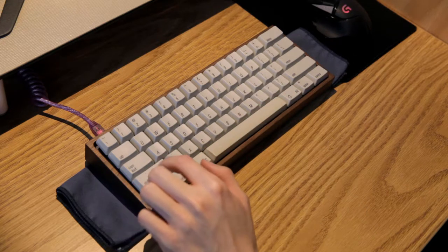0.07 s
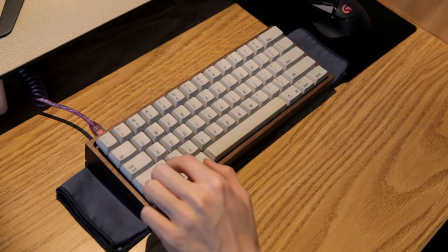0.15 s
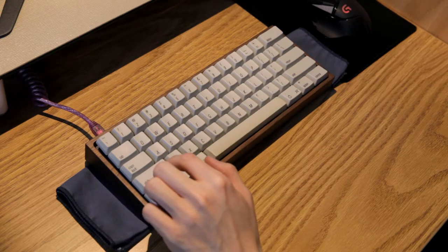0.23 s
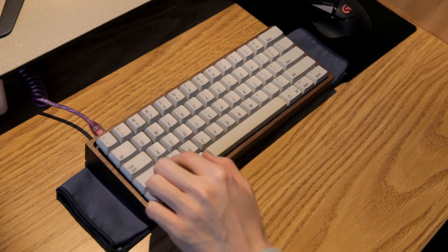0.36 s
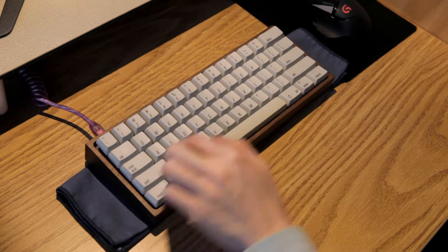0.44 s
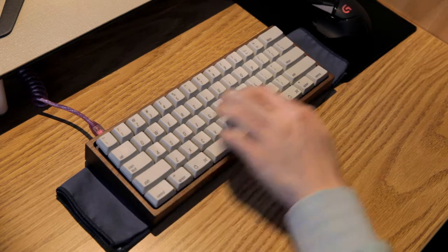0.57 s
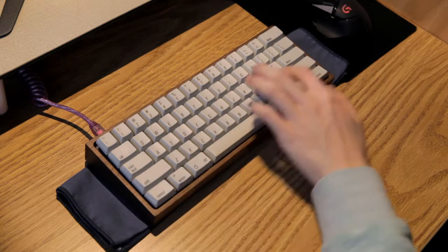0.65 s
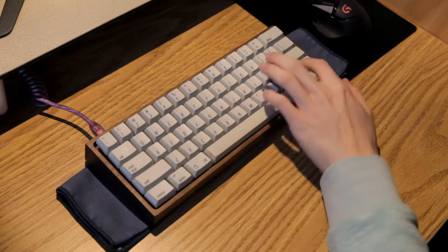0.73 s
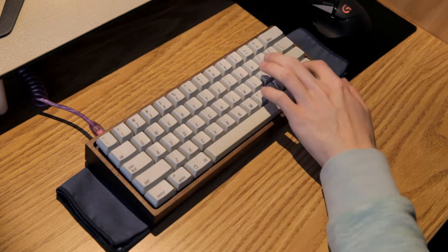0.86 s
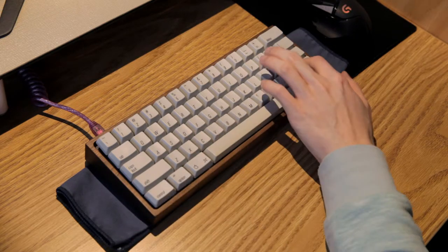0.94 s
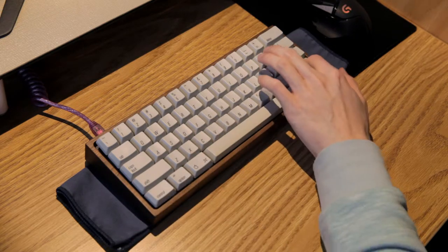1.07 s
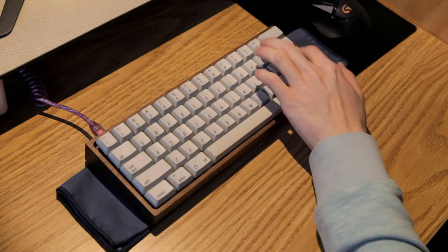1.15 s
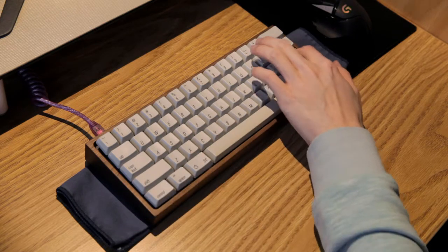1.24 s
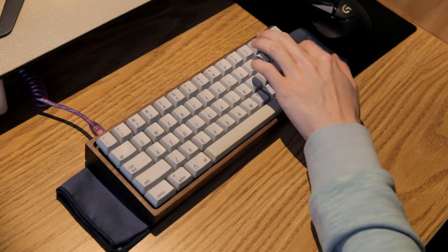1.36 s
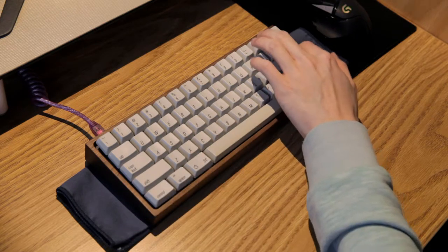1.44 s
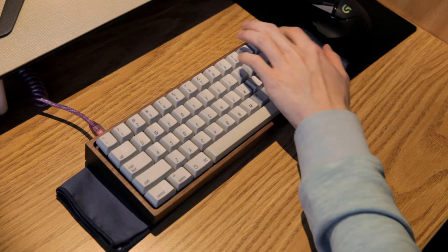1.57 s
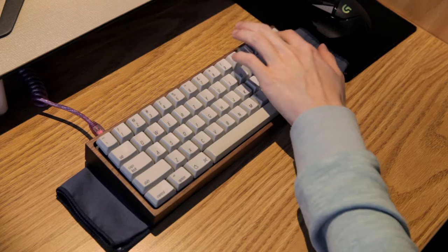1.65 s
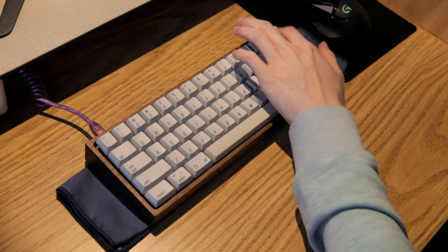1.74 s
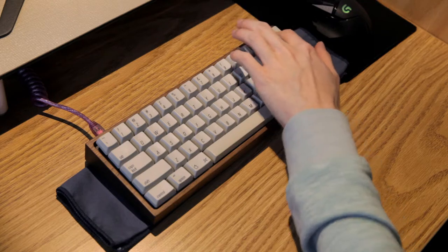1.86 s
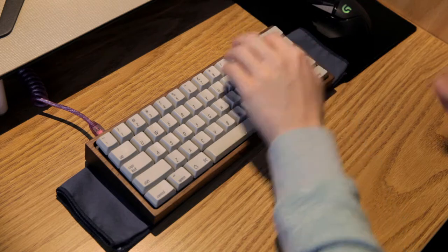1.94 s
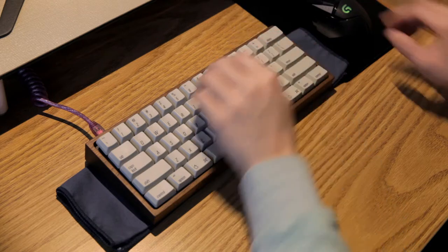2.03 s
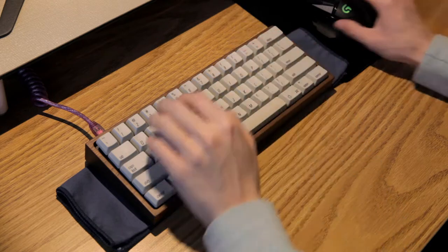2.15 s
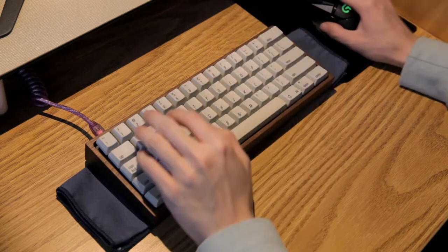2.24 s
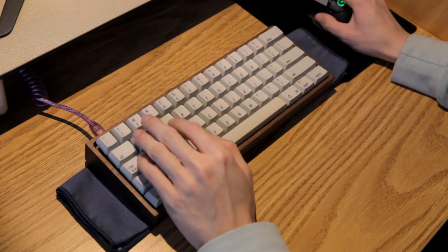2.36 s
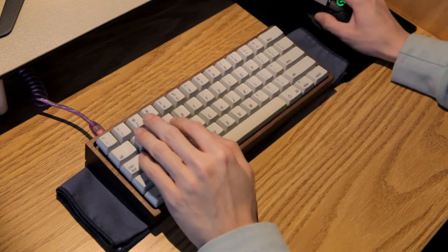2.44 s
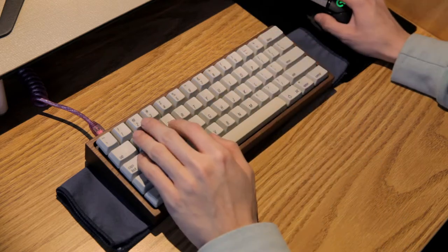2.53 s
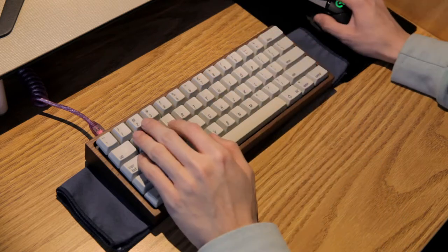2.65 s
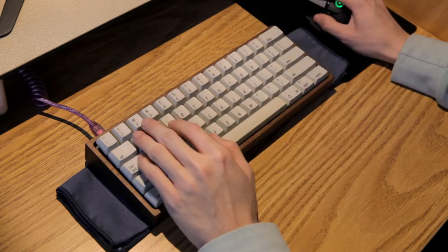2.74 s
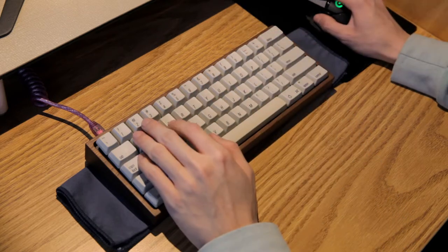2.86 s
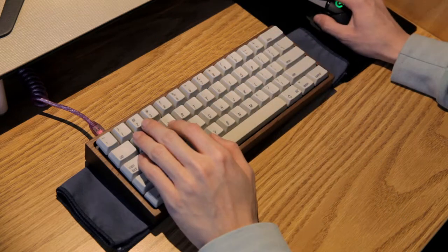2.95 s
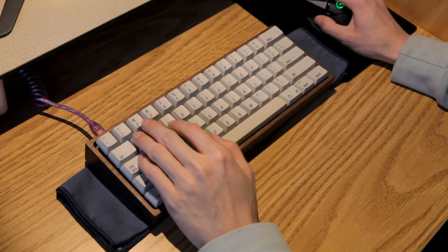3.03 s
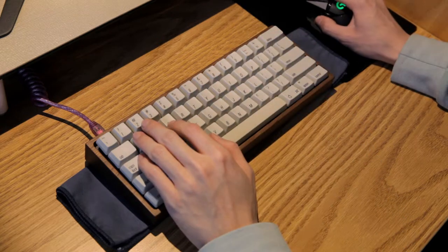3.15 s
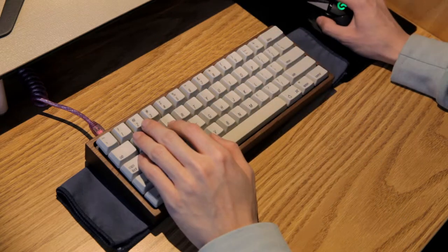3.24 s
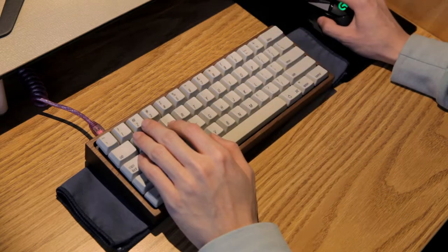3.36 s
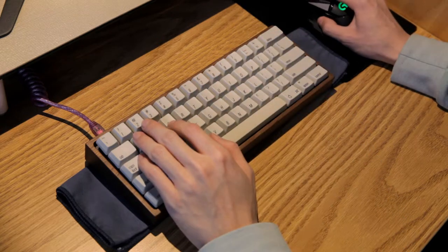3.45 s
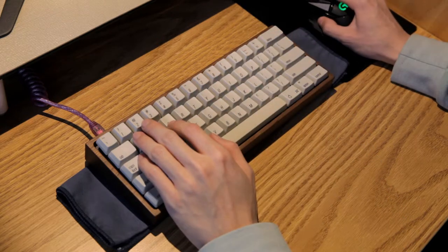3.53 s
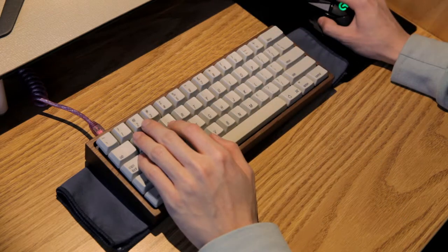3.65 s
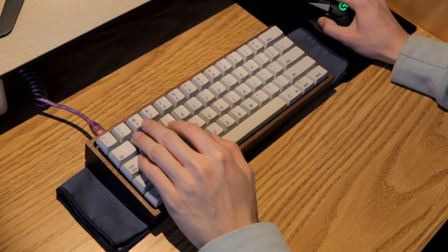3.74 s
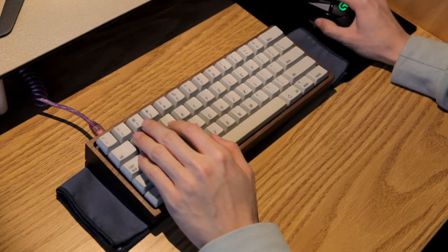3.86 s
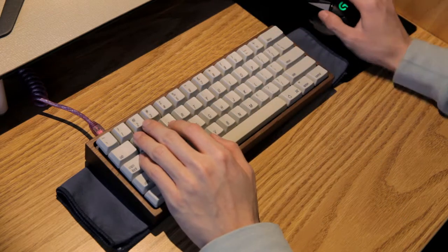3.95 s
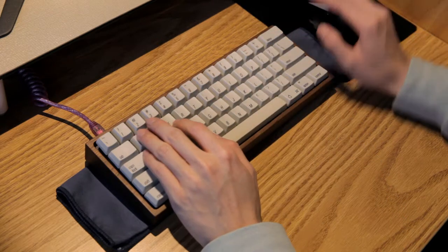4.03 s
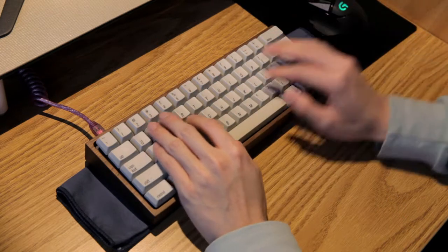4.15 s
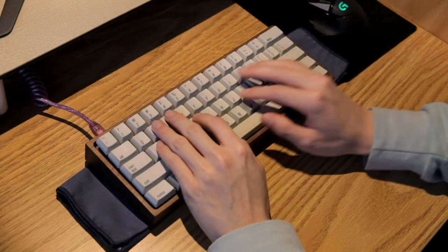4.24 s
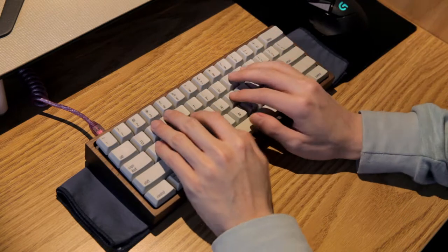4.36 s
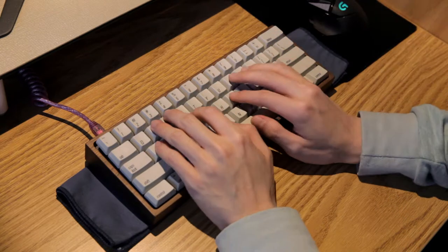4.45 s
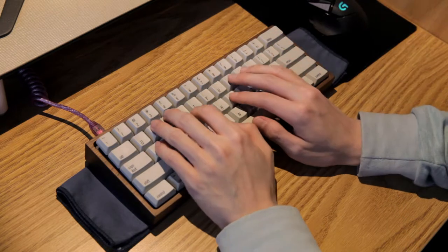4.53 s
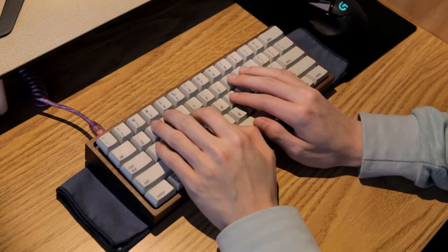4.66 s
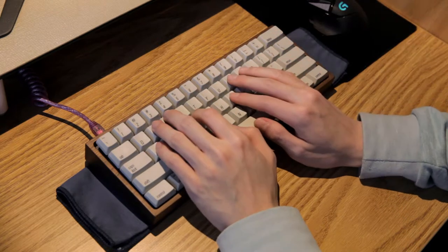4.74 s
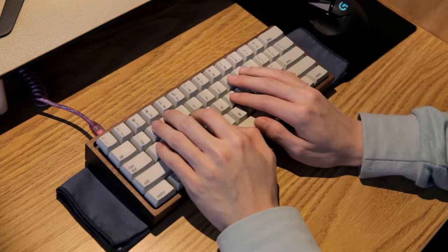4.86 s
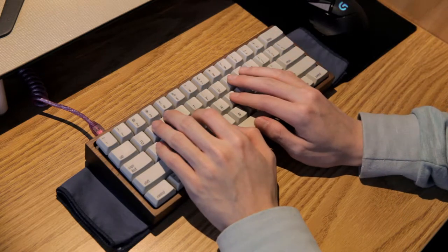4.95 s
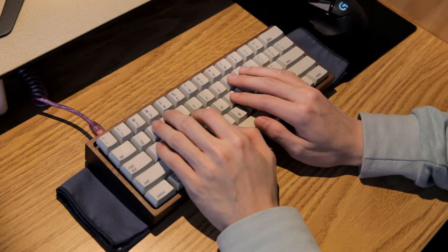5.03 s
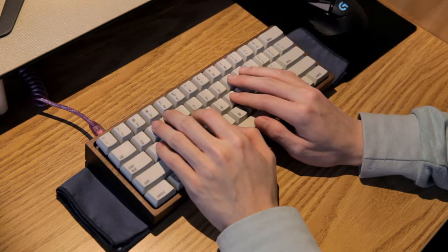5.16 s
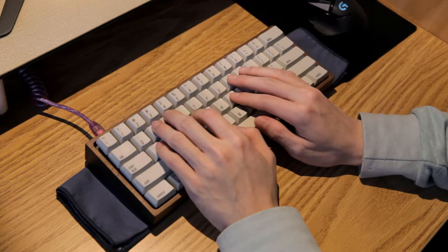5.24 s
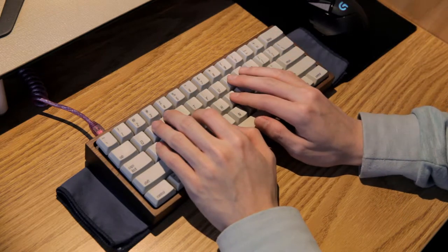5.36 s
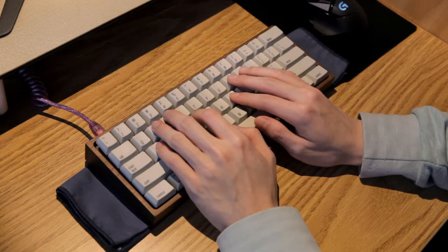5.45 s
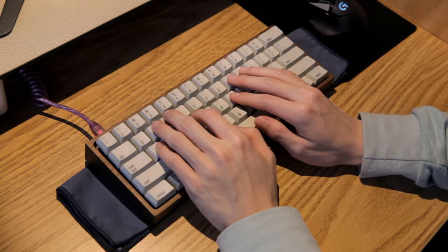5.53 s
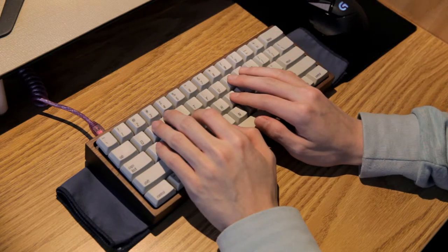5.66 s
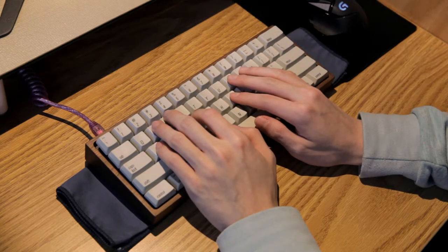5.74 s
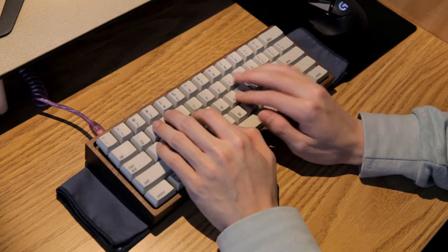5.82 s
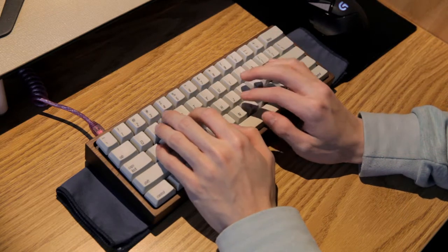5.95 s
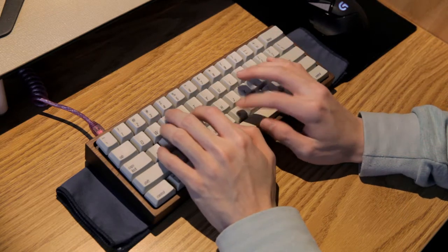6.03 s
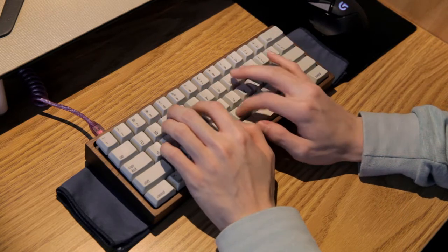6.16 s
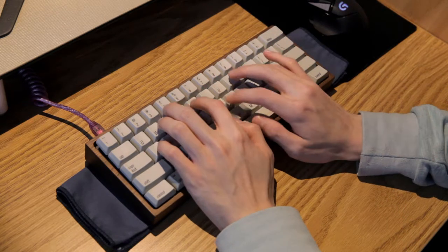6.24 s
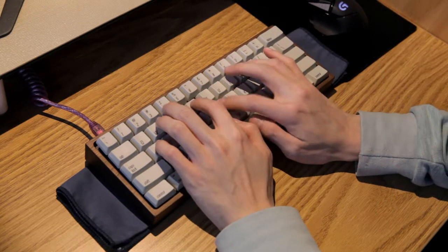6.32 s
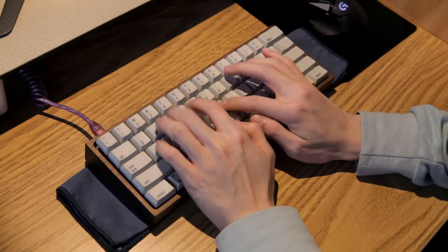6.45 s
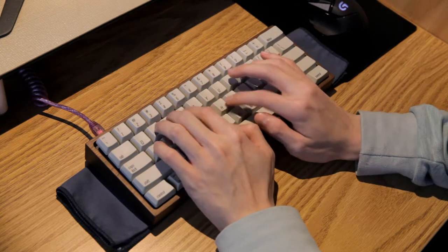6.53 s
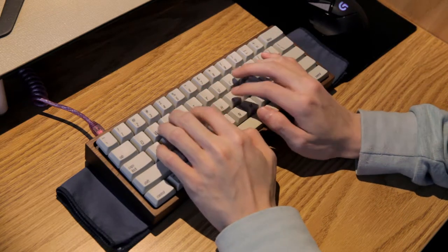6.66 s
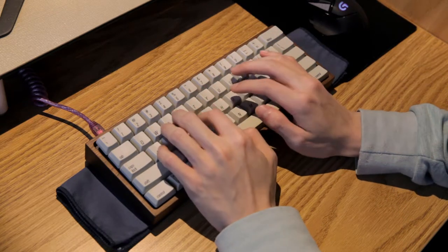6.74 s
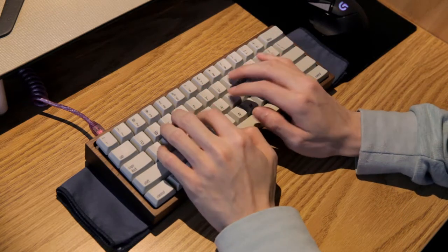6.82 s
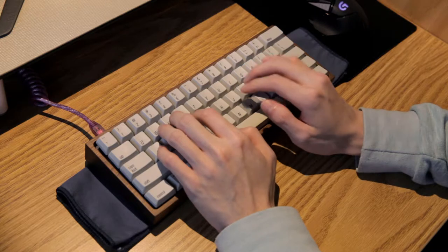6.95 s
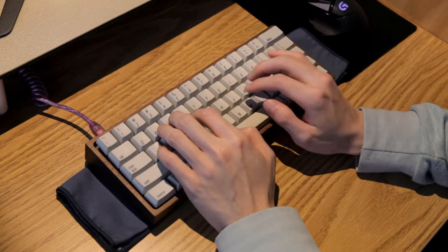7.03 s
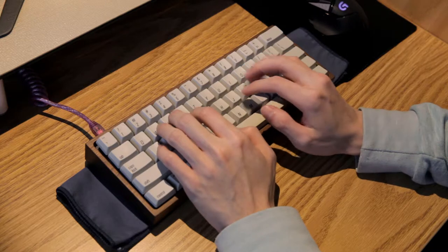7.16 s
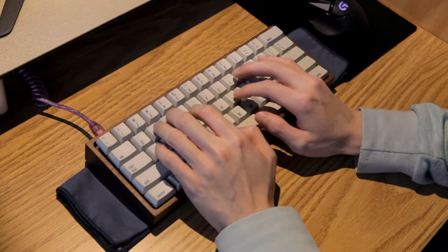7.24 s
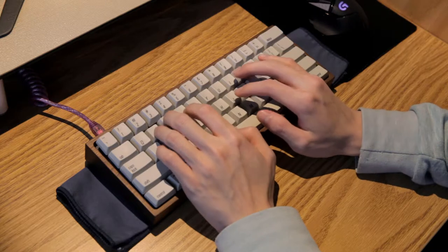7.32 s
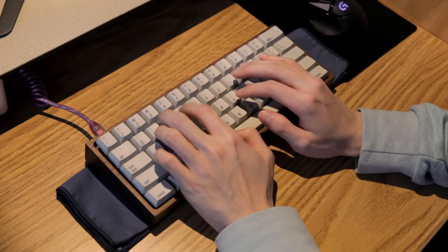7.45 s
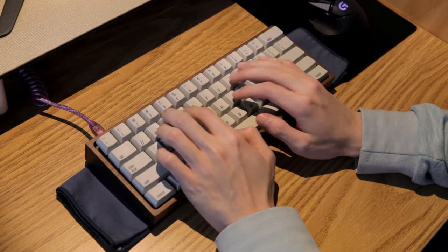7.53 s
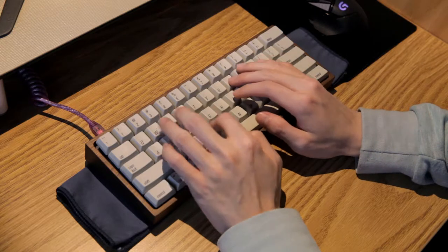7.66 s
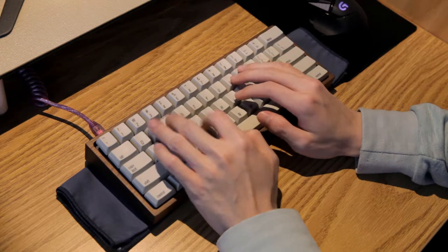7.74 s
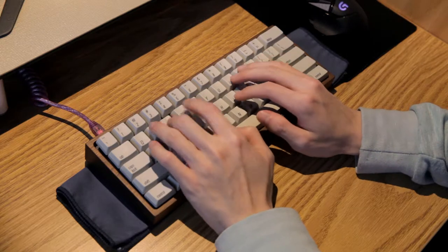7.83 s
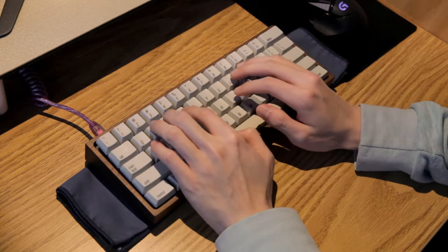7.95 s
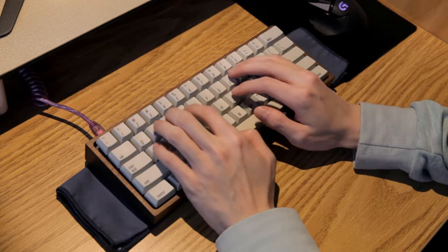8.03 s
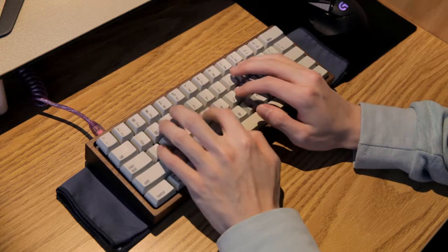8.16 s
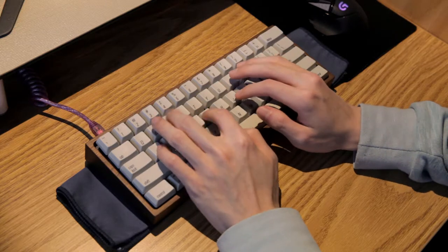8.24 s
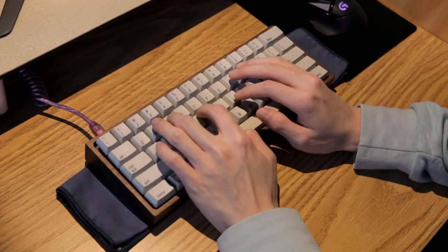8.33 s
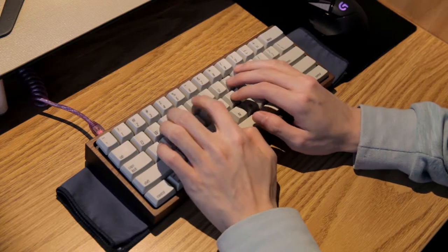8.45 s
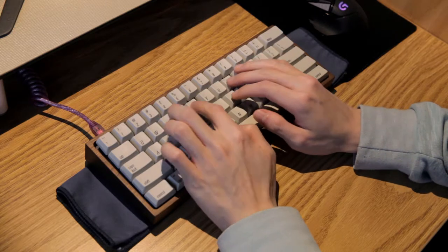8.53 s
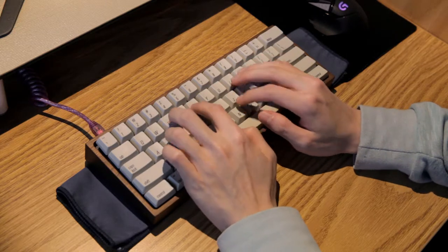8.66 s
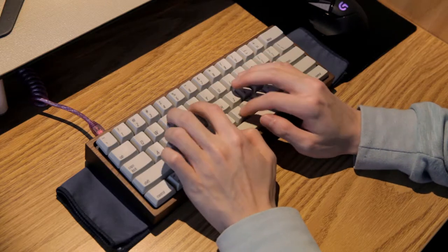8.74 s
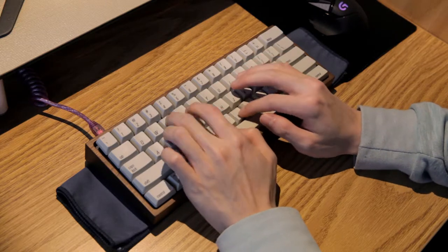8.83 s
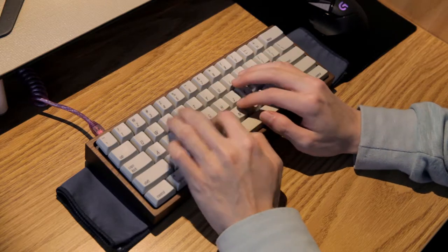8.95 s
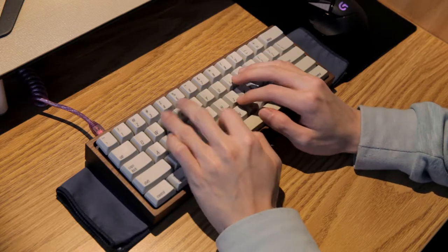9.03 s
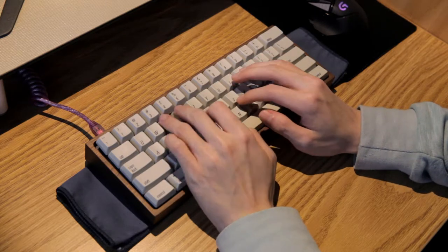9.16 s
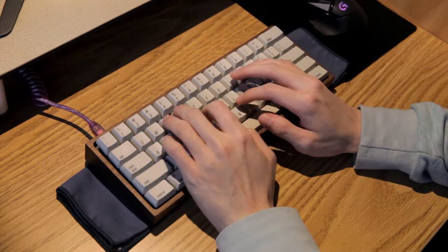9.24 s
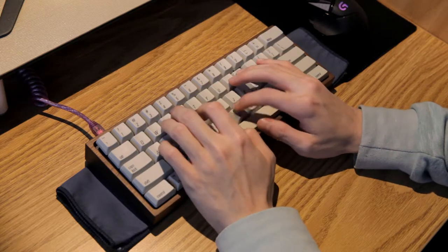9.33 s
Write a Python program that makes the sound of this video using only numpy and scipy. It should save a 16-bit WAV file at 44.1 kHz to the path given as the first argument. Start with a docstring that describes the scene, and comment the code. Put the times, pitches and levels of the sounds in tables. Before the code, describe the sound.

Crisp clicky mechanical keyboard on a wooden desk: slow single test presses, two mouse clicks, a pause, then fast continuous typing, close up.

```python
"""A clicky mechanical keyboard in a wooden case on a desk, close to a spaced microphone pair in a small room.
A deep hum swells and fades throughout. A corner key is rocked, then a wide key tried; the desk drones.
Fingers brush, a sleeve slides, a mouse button clicks twice, the sleeve slides again and a hand settles.
Fast typing follows: switches snap, keycaps land and knock case and desk, loose caps rattle.
Hits are shaped noise bursts and ringing modes; air and cloth are shaped noise, the hum a sine."""
import sys
import numpy as np
from scipy import signal
from scipy.fft import rfft, irfft, next_fast_len
from scipy.io import wavfile
from scipy.ndimage import map_coordinates

SR = 44100
rng = np.random.default_rng(int(sys.argv[2]) if len(sys.argv) > 2 else 0)


def pcm_store(signal):
    """Save signal as 16-bit PCM."""
    levels = np.round(np.clip(np.atleast_2d(signal), -1, 1) * 32767)
    wavfile.write(sys.argv[1], SR, levels.astype(np.int16).T)


N = 414099

# one hit: length in samples, time axis, frequency axis
LENGTH = 16384
AGE_S = np.arange(LENGTH) / SR
HZ = np.fft.rfftfreq(LENGTH, 1 / SR)
IMPACT_T60_S = 0.009

# wide key at the far end going down: (time [s], clack level [dB], thump level [dB])
WIDE_DOWN_STROKES = [(0.9501, -36.5, -45), (1.1289, -33.5, -35.5), (1.337, -37.5, -34.5), (1.492, -32, -34),
                     (1.7007, -32.5, -29.5), (1.867, -34.5, -31.5)]
# wide key coming up: (time [s], clack level [dB], note pitch [Hz])
WIDE_UP_STROKES = [(0.851, -31.5, 1715), (1.04, -33.5, 1367), (1.244, -31.5, 883), (1.4111, -31, 852),
                   (1.634, -36, 710), (1.779, -33.5, 850)]
# letter keys hitting bottom: (time [s], clack level [dB])
LETTER_PRESSES = [(6.41, -32.5), (6.87, -29), (7.03, -31), (7.1711, -28.5), (7.683, -29.5), (7.7654, -26),
                  (8.1903, -31), (8.791, -28), (8.9346, -28), (9.1435, -26.5), (9.35, -33)]
# keys springing back to the top stop:
# (time [s], clack level [dB], keycap pitch [Hz], case knock level [dB])
KEY_RELEASES = [(5.9413, -26.5, 2080, -47), (6.0886, -26.5, 1520, -50), (6.1816, -26, 1640, -41.5),
                (6.3012, -28, 1460, -36.5), (6.357, -27.5, 2220, -42.5), (6.4941, -28.5, 2070, -42),
                (6.5511, -25.5, 1304, -50), (6.745, -28.5, 2220, -39.5), (6.804, -26.5, 1650, -46),
                (6.96, -25.5, 1600, -51), (7.1031, -27, 1450, -50.5), (7.245, -23.5, 1700, -56),
                (7.31, -22, 1940, -49.5), (7.4916, -26, 1900, -48), (7.576, -25.5, 1960, -36),
                (7.8804, -27.5, 1890, -40.5), (8.0527, -24.5, 2150, -46), (8.096, -29, 1590, -39.5),
                (8.2857, -29, 1520, -41.5), (8.4343, -25, 1670, -57), (8.5225, -25.5, 1520, -38),
                (8.6322, -28.5, 1930, -37.5), (8.78, -26.5, 1180, -39), (8.8466, -27.5, 1540, -41.5),
                (8.991, -31.5, 1380, -42), (9.089, -27.5, 1580, -39), (9.133, -27.5, 1570, -59),
                (9.305, -24, 1570, -47)]
# thumb on the space bar: (time [s], clack level [dB])
SPACE_STROKES = [(6.649, -25.5), (7.397, -27.5), (7.9721, -27), (8.3467, -25), (8.706, -27.5),
                 (8.9668, -30.5), (9.2081, -25.5)]
# switches snapping in the typing: (time [s], level [dB])
TYPING_SNAPS = [(5.936, -34.5), (6.078, -26.5), (6.161, -33), (6.175, -30), (6.2029, -34), (6.295, -29.0),
                (6.314, -32), (6.35, -29), (6.4077, -37.5), (6.479, -30.5), (6.4865, -30.5), (6.5443, -33),
                (6.638, -35.5), (6.721, -39), (6.739, -29), (6.796, -30.5), (6.8453, -32), (6.866, -33.5),
                (6.9492, -25), (7.027, -31.5), (7.0817, -33), (7.0955, -32), (7.163, -31), (7.2402, -28),
                (7.303, -36), (7.3094, -30.5), (7.342, -36.5), (7.3855, -36.5), (7.484, -31), (7.55, -37),
                (7.562, -30), (7.57, -31.5), (7.6534, -30), (7.675, -28), (7.7604, -27.5), (7.765, -26.5),
                (7.8743, -27.5), (7.93, -36), (7.9596, -36), (8.0185, -31.5), (8.047, -30.5), (8.09, -29),
                (8.1777, -27.5), (8.186, -29.5), (8.232, -32), (8.2793, -30), (8.3262, -32.5),
                (8.3361, -31), (8.411, -39), (8.4272, -28.5), (8.5165, -27), (8.588, -36.5),
                (8.6147, -33.5), (8.625, -34.5), (8.693, -32), (8.7555, -39.5), (8.7733, -29), (8.84, -30),
                (8.894, -34), (8.9476, -30.5), (8.9659, -23), (8.98, -27), (9.065, -36.5), (9.0828, -28),
                (9.128, -36), (9.1321, -25), (9.1981, -33), (9.2808, -35.5), (9.298, -27.5), (9.343, -38.5),
                (9.383, -38.0)]
# sleeve sliding over the desk: (start [s], end [s], level [dB])
SLEEVE_SLIDES = [(2.251, 2.37, -60), (3.931, 4.492, -62.5)]
# desk modes: (frequency [Hz], relative level [dB], t60 [s])
DESK_MODES = [(119.7, -4.5, 0.78), (188.3, -10.5, 0.34), (210.6, -2, 0.21), (252.3, -0.5, 0.1),
              (322.7, -6.5, 0.17)]
# spectrum of plastic on plastic: (frequency [Hz], relative level [dB])
CLACK_SPECTRUM = [(350, -27.5), (640, -13.5), (820, 3.5), (1150, 0), (2000, 3), (3300, -5.5), (7000, -41.5)]
# spectrum of the bright edge of a landing: (frequency [Hz], relative level [dB])
EDGE_SPECTRUM = [(1800, -25.5), (4200, 9), (6500, -0.5), (11500, -1), (13000, -29)]
# spectrum of a typing switch: (frequency [Hz], relative level [dB])
SNAP_SPECTRUM = [(250, -18), (900, 0), (2000, 5), (3000, 1), (7800, 1), (8900, -5.5), (11000, 0),
                 (15500, -10.5)]
# spectrum of skin on keys and desk: (frequency [Hz], relative level [dB])
BRUSH_SPECTRUM = [(120, 4), (550, -1), (950, 6.5), (5000, -8.5), (14000, -23)]


def amp(db):
    """Amplitude gain of a level in dB."""
    return 10 ** (np.asarray(db) / 20)


def unit(x):
    """Scale to rms 1."""
    return x / np.sqrt(np.mean(x ** 2) + 1e-20)


def blow(x):
    """Scale a hit to the energy of 5 ms at rms 1, averaged over the channels."""
    energy = np.mean(np.sum(x ** 2, axis=-1))
    return x * np.sqrt(220 / (energy + 1e-20))  # 220 samples = 5 ms


def along(points, hz):
    """Interpolate (frequency [Hz], value) points on a log frequency axis."""
    f, v = np.transpose(points)
    return np.interp(np.log(hz + 1), np.log(f), v)


def fade(t60_s):
    """Exponential decay by 60 dB in t60_s."""
    return np.exp(-np.log(1000) * AGE_S / t60_s)


def sides(db):
    """Left and right gains for a left-minus-right level difference."""
    return amp(np.array([np.atleast_1d(db), -np.atleast_1d(db)]) / 2)


def add(track, s, sound):
    """Mix a sound into the track at time s."""
    start = max(round(s * SR), 0)
    track[:, start:start + LENGTH] += sound[:, :max(N - start, 0)]


def spread(pair):
    """Two unrelated signals become a spaced-microphone pair, most alike in the bass."""
    # left-right likeness: (frequency [Hz], correlation)
    likeness = [(120, 0.8), (350, 0.76), (800, 0.36), (3000, 0)]
    size = pair.shape[-1]
    turn = np.arccos(np.clip(along(likeness, np.fft.rfftfreq(size, 1 / SR)), -1, 1)) / 2
    mid, side = irfft(rfft(pair) * [np.cos(turn), np.sin(turn)], size)
    return np.array([mid + side, mid - side])


def causal(gain):
    """Minimum-phase response with this gain, by folding the cepstrum."""
    cepstrum = irfft(np.log(np.maximum(gain, 1e-6)))
    cepstrum[1:LENGTH // 2] *= 2
    cepstrum[LENGTH // 2 + 1:] = 0
    return np.exp(rfft(cepstrum))


def colour(spectrum, ripple_db=0):
    """Causal response of a spectrum, with chance peaks and dips drawn at each call."""
    position = 7 * np.log2(1 + HZ / 200)  # about 7 ripple points per octave
    ripple = map_coordinates(rng.standard_normal(64), [position], mode="nearest")
    return causal(amp(along(spectrum, HZ) + ripple_db * ripple))


def burst(response, t60_s):
    """One contact: a dense cluster of quickly dying vibrations, as filtered decaying noise."""
    envelope = fade(t60_s) * (1 - fade(0.0035))  # contact builds up over 3.5 ms
    grain = spread(rng.standard_normal((2, LENGTH))) * envelope
    return blow(irfft(rfft(grain) * response))


def ring(modes, scatter_db, skew_s):
    """Decaying modes struck at new strengths; a random lag puts the channels out of step."""
    total = np.zeros((2, LENGTH))
    opposite = np.array([[1], [-1]])
    for hz, db, t60_s in modes:
        size, lag = rng.standard_normal(2)
        wave = amp(db + scatter_db * size) * fade(t60_s) * np.exp(2j * np.pi * hz * AGE_S)
        wave = wave * rng.choice([-1, 1])
        total += np.imag(wave * np.exp(2j * np.pi * hz * skew_s * lag * opposite))
    return blow(total * (1 - fade(0.0033)))


def noise(spectrum):
    """Steady stereo noise of rms 1."""
    size = next_fast_len(N)
    pair = spread(rng.standard_normal((2, size)))
    gain = amp(along(spectrum, np.fft.rfftfreq(size, 1 / SR)))
    return unit(irfft(rfft(pair) * gain, size)[:, :N])


def level(curve):
    """A (time [s], level [dB]) curve as one gain per sample."""
    return amp(np.interp(np.arange(N) / SR, *np.transpose(curve)))


def swells(rows, rise_s, fall_s):
    """Gain of movements that build up exponentially, hold and die away."""
    t = np.arange(N) / SR
    gain = 0
    for start, end, db in rows:
        rise = np.minimum(t - start, 0) / rise_s
        fall = np.maximum(t - end, 0) / fall_s
        gain = gain + amp(db) * np.exp(rise - fall)
    return gain


def background():
    """Still air, a swelling sine hum, the desk droning under the arm, cloth sliding on wood."""
    # deep hum: (time [s], level [dB])
    hum_curve = [(0.0, -71), (0.5, -55.5), (2.19, -71), (2.59, -50), (3.14, -51), (3.53, -66.5),
                 (4.48, -50), (4.84, -73), (5.02, -57), (9.02, -48)]
    # arm shifting its weight: (start [s], end [s], level [dB])
    arm_leans = [(1.14, 1.22, -42.5), (1.66, 1.72, -41.5), (1.97, 2.29, -51.5)]
    # spectra of air, desk drone and cloth: (frequency [Hz], relative level [dB])
    air_spectrum = [(20, -26), (70, -1.5), (125, -1), (200, 5), (310, -10.5), (700, -12.5), (15000, -35.5)]
    drone_spectrum = [(85, -38), (121, 22.5), (155, -33), (211, 8.5), (280, -40)]
    cloth_spectrum = [(200, 7.5), (5000, -4), (11800, -14.5), (13500, -19)]
    hum_hz, catch_db = 47.1, 1.9
    hum = level(hum_curve) * unit(np.sin(2 * np.pi * hum_hz * np.arange(N) / SR))
    # the cloth catches unevenly: random gain, one point per 1000 samples
    catching = map_coordinates(rng.standard_normal(N // 1000 + 4), [np.arange(N) / 1000])
    slide = swells(SLEEVE_SLIDES, rise_s=0.055, fall_s=0.076)
    sleeve = slide * amp(catch_db * catching) * noise(cloth_spectrum)
    air = amp(-60.5) * noise(air_spectrum)
    drone = swells(arm_leans, rise_s=0.03, fall_s=0.05) * noise(drone_spectrum)
    return air + hum + sleeve + drone


def keycaps():
    """All keys landing or springing back, each with its knock on case and desk."""
    # corner key rocked without clicking, lifts then thuds: (time [s], clack level [dB])
    corner_lifts = [(0.1725, -46.5), (0.3276, -43)]
    corner_thuds = [(0.2444, -45.5), (0.4092, -43.5)]
    # body modes of wide key and space bar: (frequency [Hz], relative level [dB])
    wide_body = [(450, -0.5), (850, 1.5), (1380, 1)]
    space_body = [(388, -7), (877, -0.5), (1270, 0)]
    # case modes under the wide key: (frequency [Hz], relative level [dB], t60 [s])
    far_case_modes = [(206, 1.5, 0.19), (334, -6, 0.087)]
    desk_db, corner_desk_db = 1, -13  # desk ring relative to case knock
    press_knock_db = -18  # case knock relative to clack
    free_db, note_growth = 19, 0.35  # clack over knock above which a cap rings freely; dB per dB
    track = np.zeros((2, N))
    for s, db in corner_lifts:
        add(track, s, keycap(db, hz=1560) + knock(db + press_knock_db, corner_desk_db))
    for s, db in corner_thuds:
        add(track, s, long_key(db, 1130, wide_body) + knock(db + 3.5, corner_desk_db))
    for s, db, hz in WIDE_UP_STROKES:
        note = amp(db - 4) * ring([(hz, 0, 0.022)], scatter_db=0, skew_s=0)
        add(track, s, long_key(db, hz, wide_body) + note + knock(db - 12, desk_db))
    for s, db, thump_db in WIDE_DOWN_STROKES:
        thump = amp(thump_db + 1) * ring(far_case_modes, scatter_db=0, skew_s=0)
        add(track, s, long_key(db, 1310, wide_body) + thump + knock(db - 1, desk_db))
    for s, db, hz, knock_db in KEY_RELEASES:
        # a finger that stays on the cap damps its note and loads the case; a cap let go rings freely
        note_db = np.clip(note_growth * (db - knock_db - free_db), -4, 4)
        add(track, s, keycap(db, hz, note_db) + knock(knock_db, desk_db))
    for s, db in LETTER_PRESSES:
        add(track, s, keycap(db, hz=900) + knock(db + press_knock_db, desk_db))
    for s, db in SPACE_STROKES:
        add(track, s, long_key(db, 1880, space_body) + knock(db - 7.5, desk_db))
    return track


def keycap(db, hz, note_db=0):
    """A small keycap lands: its shell rings for a few cycles and the plate answers."""
    # plate modes: (frequency [Hz], relative level [dB])
    plate_modes = [(530, 6.5), (786, 0), (930, 6.5), (1210, 1.5), (1448, 1.5), (1620, -0.5), (1875, -4),
                   (2060, 5.5)]
    # the harder the blow, the more the impact and the shell's own note stand out
    firm = amp(0.5 * (db + 15.5))
    shell_t60_s = 0.011 * amp(note_db)
    shell = amp(0.5 + note_db) * ring([(hz, 0, shell_t60_s)], scatter_db=0, skew_s=0.00002)
    # a low-pitched cap also gives a duller clack
    dull = causal(1 / np.sqrt(1 + (HZ / (1.8 * hz)) ** 4))
    plastic = colour(CLACK_SPECTRUM, ripple_db=1.5) * dull
    impact = amp(-note_db) * burst(plastic, IMPACT_T60_S)
    chatter = amp(-6.5) * burst(plastic, t60_s=0.037)
    # plate modes near the keycap's own pitch are driven hardest: -9 dB per octave away
    driven = [(f, mode_db - 9 * abs(np.log2(f / hz)), 0.055) for f, mode_db in plate_modes]
    plate = amp(-7) * ring(driven, scatter_db=4.5, skew_s=0.00007)
    edge = amp(0.82 * db - 15.5) * burst(colour(EDGE_SPECTRUM), t60_s=0.01)
    return amp(db) * (firm * (shell + impact) + chatter + plate) + edge


def knock(db, desk_db):
    """A landing knocks the wooden case (noise burst) and shakes the desk (modes)."""
    # wooden case: (frequency [Hz], relative level [dB])
    case_spectrum = [(40, -26), (100, -8.5), (230, -5), (440, 3.5), (680, -0.5), (1200, -36.5)]
    case = amp(0.5) * burst(colour(case_spectrum), t60_s=0.028)
    desk = amp(desk_db) * ring(DESK_MODES, scatter_db=2, skew_s=0.00005)
    return amp(db) * (case + desk)


def long_key(db, hz, body):
    """A long key lands with a hollow knock: fixed body modes, driven ever less above hz."""
    def soft(f):
        """Second-order low-pass gain with its corner at hz."""
        return 1 / np.sqrt(1 + (f / hz) ** 4)

    driven = [(f, mode_db + 20 * np.log10(soft(f)), 0.025) for f, mode_db in body]
    modes = ring(driven, scatter_db=3, skew_s=0.00004)
    plastic = colour(CLACK_SPECTRUM) * causal(soft(HZ))
    impact = burst(plastic, t60_s=0.031)
    # its other end lands a moment later
    delay_s = rng.uniform(0.00388, 0.013)
    other_end = np.roll(burst(plastic, IMPACT_T60_S), round(SR * delay_s), axis=-1)
    edge = burst(colour(EDGE_SPECTRUM), t60_s=0.014)
    return amp(db) * (modes + amp(-5) * impact + amp(-7.5) * other_end + amp(-11.5) * edge)


def switches():
    """The clicks of the wide key and of the typing, plus the typing's loose-cap rattles."""
    # wide key's switch, up and down: (time [s], level [dB])
    wide_snaps = [(0.8313, -42), (0.8392, -32.5), (0.946, -33), (1.0243, -33), (1.1231, -31),
                  (1.2348, -33.5), (1.3326, -36), (1.4015, -34.5), (1.4873, -33), (1.6255, -33.5),
                  (1.7003, -34.5), (1.7681, -33), (1.8604, -38)]
    # its lower snap: (frequency [Hz], relative level [dB])
    wide_snap_spectrum = [(600, -11.5), (2400, 1.5), (4600, 6), (7000, -6), (11000, -3.5), (15500, -10)]
    trial = snaps(wide_snaps, wide_snap_spectrum, rattle_db=-5, rebound_db=-4.5)
    typing = snaps(TYPING_SNAPS, SNAP_SPECTRUM, rattle_db=-5, rebound_db=-3.5)
    return trial + typing + rattles()


def snaps(rows, spectrum, rattle_db, rebound_db):
    """The stem ticks on the housing; the click spring snaps, sings briefly, rebounds and rattles."""
    spring_low_hz, spring_high_hz, spring_db = 5200, 9000, -11
    longest_rebound_s = 0.0065
    track = np.zeros((2, N))
    for s, db in rows:
        snap = colour(spectrum, ripple_db=2.2)
        pitch, lead, wait, size = rng.random(4)
        spring_hz = np.interp(pitch, (0, 1), (spring_low_hz, spring_high_hz))
        note = ring([(spring_hz, 0, IMPACT_T60_S / 2)], scatter_db=0, skew_s=0.00005)
        click = amp(-3.5) * burst(snap, IMPACT_T60_S) + amp(spring_db) * note
        click = click + amp(rattle_db) * burst(snap, t60_s=0.027)
        add(track, s, amp(db) * sides(rng.normal(0, 3.8)) * click)
        stem_s = s - 0.0028 * (0.5 + lead)
        add(track, stem_s, amp(db - 17) * burst(snap, IMPACT_T60_S * 2))
        rebound_s = s + longest_rebound_s * (1 + wait) / 2
        add(track, rebound_s, amp(db + rebound_db - 8.4 * size) * burst(snap, IMPACT_T60_S))
    return track


def fingers():
    """Soft fingertip contacts: the pad meeting and pushing each key, stray touches, the heel of the hand."""
    # fingers brushing keys and desk: (time [s], level [dB], pitch of touched part [Hz])
    stray_touches = [(2.03, -53.5, 3000), (2.364, -39.5, 417), (2.509, -44.5, 500), (4.106, -44.5, 1920),
                     (4.321, -42, 810), (4.341, -45, 850), (4.36, -39, 835), (4.656, -39, 1920),
                     (5.774, -45.5, 886), (5.806, -38, 810), (5.834, -39.5, 1500)]
    track = np.zeros((2, N))
    brush = colour(BRUSH_SPECTRUM)
    push = colour([(50, -22.5), (75, 8.5), (230, 5.0), (420, -24.0)])  # (Hz, dB)
    strokes = LETTER_PRESSES + KEY_RELEASES + SPACE_STROKES + WIDE_DOWN_STROKES + WIDE_UP_STROKES
    for s, db, *_ in strokes:
        add(track, s - rng.uniform(0.012, 0.022), amp(db - 15) * burst(brush, t60_s=0.033))
        add(track, s, amp(db - 12) * burst(push, t60_s=0.093))
    for s, db, hz in stray_touches:
        hollow = amp(-5.5) * ring([(hz, 0, 0.035)], scatter_db=0, skew_s=0)
        skin = burst(colour(BRUSH_SPECTRUM, ripple_db=2.5), t60_s=0.067)
        add(track, s, amp(db - 7) * (skin + hollow))
    heel_s, heel_db = 4.664, -43
    add(track, heel_s, amp(heel_db) * ring(DESK_MODES, scatter_db=0, skew_s=0))
    return track


def grazes():
    """Skin catches on the keys at random while the sleeve slides."""
    rate_per_s, greatest_db = 28, -51
    track = np.zeros((2, N))
    for start, end, _ in SLEEVE_SLIDES:
        count = int(rate_per_s * (end - start))
        for when, size in rng.random((count, 2)):
            skin = burst(colour(BRUSH_SPECTRUM, ripple_db=5.5), t60_s=0.037)
            add(track, start + when * (end - start), amp(greatest_db) * size * skin)
    return track


def mouse():
    """A microswitch ticks in its plastic shell, the button snaps drily and the leaf spring rings on."""
    # clicks: (button down [s], button up [s], level [dB])
    mouse_clicks = [(2.785, 2.869, -34), (3.608, 3.704, -34.5)]
    # button resonances: (frequency [Hz], relative level [dB])
    button_modes = [(2300, 1), (4400, 2), (6100, 3)]
    track = np.zeros((2, N))
    # spectra: (Hz, dB)
    spring = colour([(7000, -35), (9300, -14), (9720, 0), (13200, -16), (15000, -35)])
    shell = colour([(1200, -5), (5000, -3), (16000, -5.5)])
    modes = [(hz, mode_db, IMPACT_T60_S) for hz, mode_db in button_modes]
    for down, up, db in mouse_clicks:
        for s in down, up:
            button = ring(modes, scatter_db=2, skew_s=0.00005)
            click = burst(shell, t60_s=0.035) + amp(-12) * button
            click = click + amp(-6.5) * burst(spring, t60_s=0.15)
            add(track, s, amp(db - 11.5) * click)
    return track


def rattles():
    """Loose keycaps tick and clatter at random under the hurrying fingers."""
    rate_per_s, rattle_db = 27, -46.5
    track = np.zeros((2, N))
    start, end = TYPING_SNAPS[0][0], TYPING_SNAPS[-1][0]
    count = int(rate_per_s * (end - start))
    for when, tick, clatter in rng.random((count, 3)):
        sound = tick * burst(colour(SNAP_SPECTRUM), IMPACT_T60_S)
        plastic = colour(CLACK_SPECTRUM, ripple_db=6)
        sound = sound + 2 * clatter * burst(plastic, 2 * IMPACT_T60_S)
        add(track, start + when * (end - start), amp(rattle_db) * sound)
    return track


def room(x):
    """Reverberation by decaying noise, drawn anew every tenth of a second as the hands move."""
    # reverberation: (frequency [Hz], t60 [s])
    room_t60 = [(200, 0.4), (700, 0.21), (6000, 0.22), (14000, 0.13)]
    wet, step = np.zeros((2, N)), SR // 10
    size = LENGTH - step
    for start in range(0, N, step):
        hz, t, z = signal.stft(rng.standard_normal((2, size)), SR, nperseg=256)
        decay = amp(-60 * t / along(room_t60, hz)[:, None])
        tail = signal.istft(z * decay, SR, nperseg=256)[1][:, :size]
        tail = spread(tail * (1 - fade(0.0079)[:size]))
        tail = tail / np.linalg.norm(tail[0])
        # both channels feed the room as one source
        source = x[:, start:start + step].sum(axis=0, keepdims=True) / np.sqrt(2)
        add(wet, start / SR, irfft(rfft(source, LENGTH) * rfft(tail, LENGTH)))
    return wet


def scene():
    """Keyboard, fingers and mouse in their room, over the background."""
    close = keycaps() + switches() + fingers() + grazes() + mouse()
    return close + amp(-9.5) * room(close) + background()


def record(dry):
    """The two microphones differ in colour; nothing passes above the band limit."""
    # microphone difference: (frequency [Hz], left minus right [dB])
    mic_tilt = [(480, -.3), (720, -5), (1200, 0), (2300, -1.3), (6600, -4), (9800, 7), (12500, -3)]
    top_hz = 16100
    size = next_fast_len(N + SR // 2)
    hz = np.fft.rfftfreq(size, 1 / SR)
    response = sides(along(mic_tilt, hz)) * (hz < top_hz)
    return irfft(rfft(dry, size) * response, size)[:, :N]


dry = scene()
out = record(dry)
pcm_store(out)
```